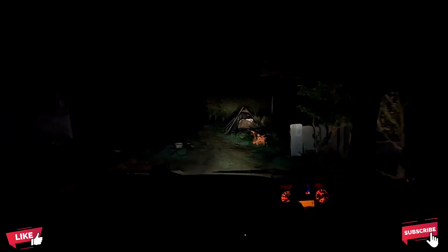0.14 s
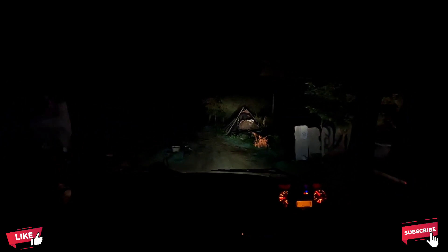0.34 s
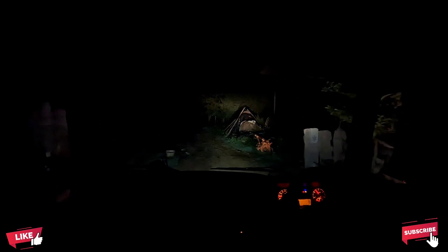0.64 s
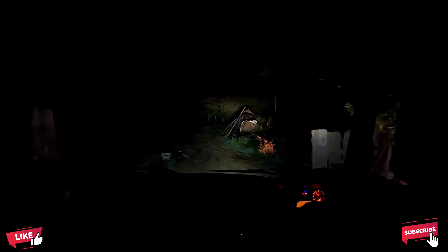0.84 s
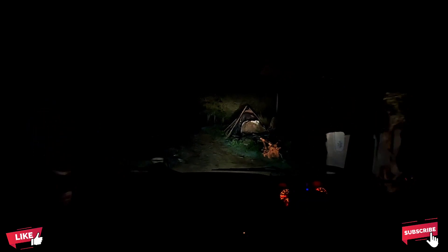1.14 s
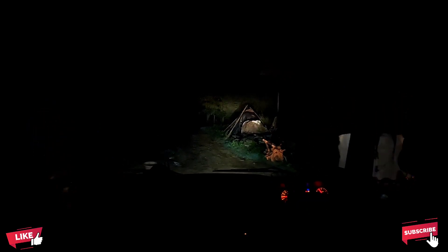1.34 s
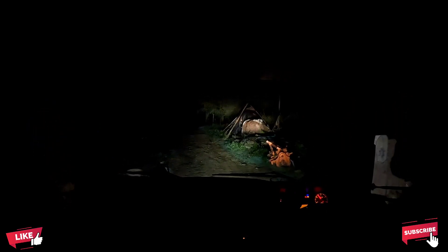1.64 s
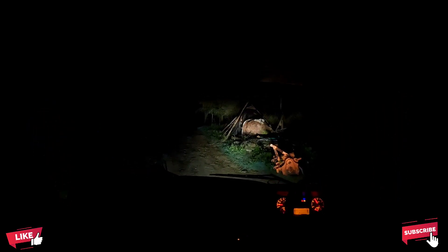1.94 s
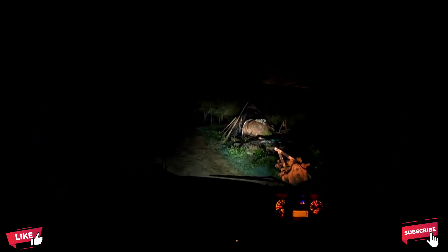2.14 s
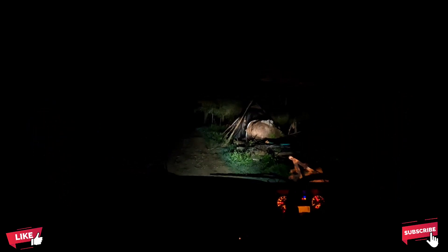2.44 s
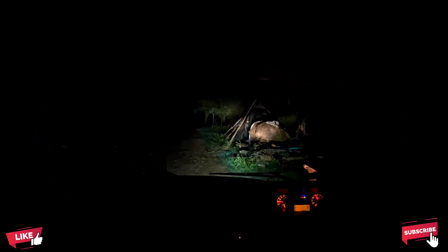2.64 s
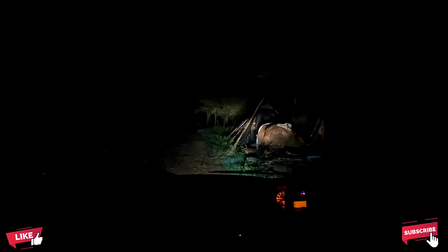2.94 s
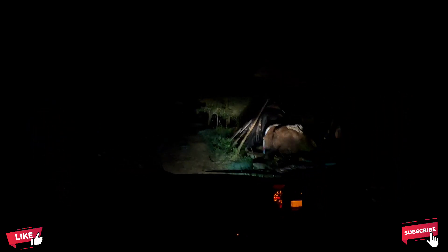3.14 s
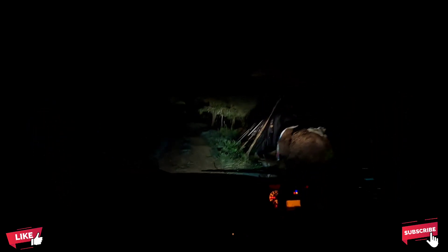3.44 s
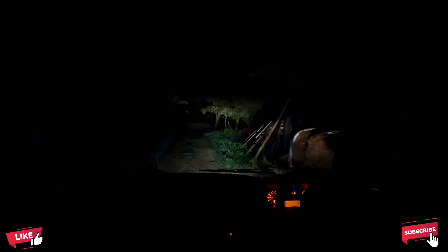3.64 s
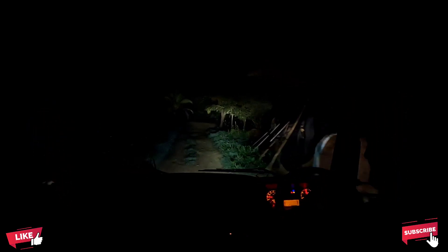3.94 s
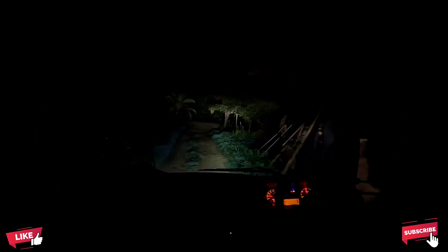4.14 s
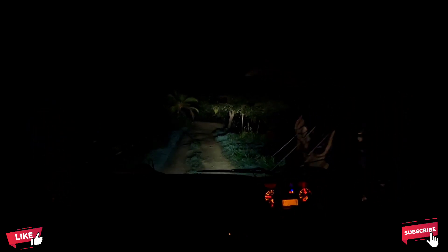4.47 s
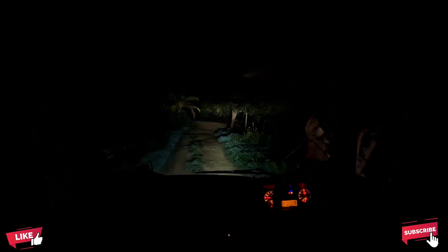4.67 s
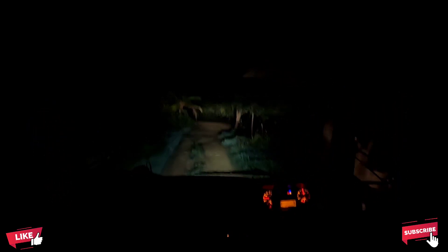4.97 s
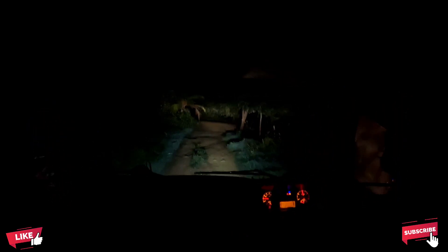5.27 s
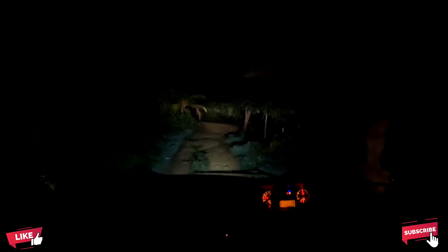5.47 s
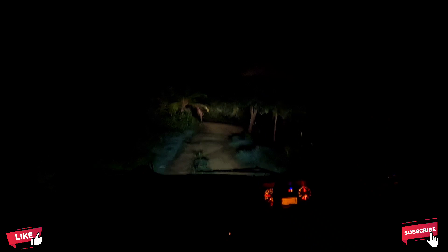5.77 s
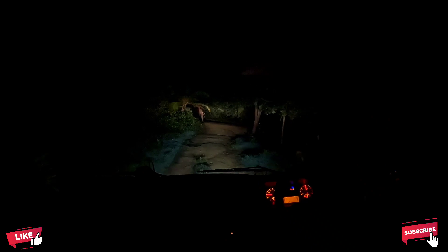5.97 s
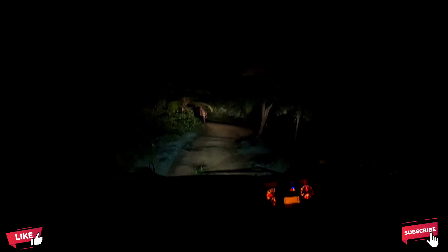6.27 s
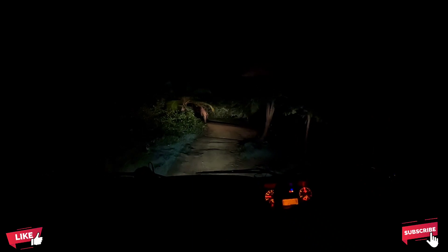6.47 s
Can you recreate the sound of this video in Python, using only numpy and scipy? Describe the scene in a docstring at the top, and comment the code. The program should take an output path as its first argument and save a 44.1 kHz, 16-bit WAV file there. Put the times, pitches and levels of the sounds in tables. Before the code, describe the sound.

A diesel truck rumbles slowly along a rough track, heard inside the cab, with loose panels knocking and rattling over the bumps.

```python
"""Diesel truck on a rutted track

From inside the cab, you hear a loaded truck crawl along and slowly gather speed. The firing cylinders
rumble and make the cab drone, gear teeth whine, and air hisses into the engine's intake.
Ruts rock the cab, loose panels knock and rattle over the bumps, and small metal parts clink."""
import sys
import numpy as np
from scipy import signal
from scipy.io import wavfile

SR = 44100
rng = np.random.default_rng(int(sys.argv[2]) if len(sys.argv) > 2 else 0)


def output_pcm(signal):
    """Save a mono or channel-first signal as 16-bit PCM at the path in sys.argv[1].

    Samples are clipped to [-1, 1] before scaling.
    """
    pcm = np.clip(np.atleast_2d(signal).T, -1, 1) * 32767
    wavfile.write(sys.argv[1], SR, np.round(pcm).astype(np.int16))


N = 291501
TIME = np.arange(N) / SR

# Engine speed, given as how often the gear teeth meet: (time [s], mesh rate [Hz])
MESH_RATE = [(0, 260), (0.2, 265), (0.47, 296.7), (0.8, 276.9), (1.12, 285.8), (1.3, 309.3), (1.6, 281.3),
             (1.88, 307.2), (2.36, 307.1), (2.62, 329.4), (2.85, 327), (3.08, 334.3), (3.35, 339),
             (3.65, 348.7), (4.75, 365.4), (5.6, 401.5), (5.95, 380.4), (6.2, 393.3), (6.5, 364)]
CRUISE_MESH_HZ, TEETH_PER_FIRING = 340, 6.17
# The four cylinders fire unequally: (strength [dB])
CYLINDER_DB = [-1.1, -5.5, -3, -1]
# Tone of the engine's deep rumble: (frequency [Hz], relative level [dB])
RUMBLE_SPECTRUM = [(55, 7), (75, 8), (105, 4.5), (160, 2), (220, 1.5), (300, -25)]
# Tone of the engine block's roar: (frequency [Hz], relative level [dB])
ROAR_SPECTRUM = [(170, -12.5), (250, -7), (330, -1), (430, -5), (600, -7), (800, -18), (1100, -19.5),
                 (2000, -54)]
# Tone of the hard clatter of burning fuel: (frequency [Hz], relative level [dB])
CLATTER_SPECTRUM = [(600, 4), (900, 1.5), (1400, -1.5), (2000, -8.5), (2700, -14), (3500, -25), (4500, -57),
                    (7000, -44), (11000, -23.5), (15500, -49)]
# The cab air drones in step with the firings: (time [s], level [dB])
DRONE_LEVEL = [(0, -22), (0.07, -27), (0.13, -41), (0.25, -44), (0.3, -26), (0.48, -20.5), (0.62, -22.5),
               (0.72, -34), (0.88, -20.5), (0.97, -34), (1.1, -24), (1.25, -31), (1.38, -19.5),
               (1.53, -25.5), (1.62, -29), (1.8, -27), (2.05, -20), (2.21, -24.5), (2.35, -21),
               (2.48, -23.5), (2.62, -17.5), (2.76, -31), (2.87, -21), (3.05, -23.5), (3.2, -27.5),
               (3.55, -38), (3.7, -23.5), (3.92, -30.5), (4.1, -24.5), (4.3, -24.5), (4.8, -23.5),
               (5.05, -31.5), (5.28, -26), (5.5, -33.5), (6.61, -27)]
# The gear teeth sing as they take load: (time [s], level [dB])
WHINE_LEVEL = [(0, -43), (0.3, -41), (0.45, -28.5), (0.75, -46), (0.95, -37), (1.06, -39), (1.28, -34),
               (1.68, -44), (1.86, -28.5), (2.25, -31.5), (2.42, -30), (2.62, -28), (2.85, -26.5),
               (3.03, -33), (3.12, -35.5), (3.45, -30), (3.62, -29.5), (3.95, -37.5), (4.9, -30),
               (5.4, -41.5), (5.6, -30.5), (5.9, -36), (6.2, -38.5), (6.61, -29)]
# At speed the teeth rattle in their gaps: (mesh rate [Hz], phase jitter [rad], level waver [dB])
BACKLASH = [(331, .13, 1.2), (339, 1.15, 2.8)]
# Air drawn by the engine, shut off near the end: (time [s], level [dB])
AIRFLOW = [(0, -65), (0.55, -63), (1.05, -67.5), (1.22, -59.5), (1.55, -59), (1.72, -61), (2.15, -55),
           (2.4, -59), (2.7, -54.5), (3.15, -53.5), (3.9, -54.5), (4.4, -57), (4.95, -55.5), (5.22, -54),
           (5.65, -51), (5.85, -79), (6.61, -70)]
# Resonances of the intake pipe: (pitch [Hz], width [Hz], gain [dB])
DUCT_MODES = [(477, 17, 44.5), (1066, 530, 27.5), (1670, 436, 24.5), (3280, 100, 10), (4370, 2500, -3),
              (5740, 1200, 4.5), (7530, 1700, 2.5), (7740, 470, 1)]
# Tone of the intake's hiss: (frequency [Hz], relative level [dB])
HISS_SPECTRUM = [(3000, -18), (4500, -1.5), (6000, 2.5), (7700, -1), (10000, -3), (11200, -4), (12500, -14),
                 (15500, -15)]
# Air whistles at the lip of the intake: (time [s], level [dB], pitch [Hz])
WHISTLE = [(0, -83, 5700), (0.55, -65, 5700), (1.11, -73, 5680), (1.17, -63.5, 5740), (1.45, -58, 5720),
           (1.52, -54, 5950), (1.59, -58, 5700), (1.64, -68, 5750), (1.9, -64, 5700), (2.15, -59, 5740),
           (2.42, -59, 5700), (2.6, -67, 5680), (2.66, -57, 5650), (2.77, -62, 5650), (2.95, -55, 5694),
           (3.04, -62, 5700), (3.15, -60, 5620), (3.4, -63, 5710), (3.7, -61, 5714), (4.15, -61, 5674),
           (4.4, -61, 5638), (4.9, -63, 5550), (5.22, -58, 5530), (5.62, -60, 5550), (5.85, -82, 5570)]
# The wheels roll through ruts: (time at the deepest [s], length [s], rocking [dB], rumble lift [dB])
RUTS = [(0.46, 0.12, -18.5, 5.5), (0.797, 0.28, -19, 2.5), (1.108, 0.087, -22, 2.5),
        (1.562, 0.28, -15, 3.5), (1.9, 0.24, -19.5, 4.5), (2.1, 0.17, -11.5, 3.5), (2.31, 0.19, -14.5, 1.5),
        (2.627, 0.31, -16, 0.5), (3.2, 0.74, -18, 1.5), (3.515, 0.53, -13.5, -0.5), (3.859, 0.39, -13.5, 1),
        (4.104, 0.17, -11.5, 1), (4.373, 0.4, -13.5, 3.5), (4.565, 0.13, -26, 4.5),
        (4.93, 0.17, -12.5, 1.5), (5.255, 0.27, -10.5, 1), (5.418, 0.2, -11.5, -1), (5.602, 0.23, -11.5, 6),
        (5.753, 0.18, -13.5, 0), (5.993, 0.17, -15.5, 4.5), (6.2, 0.27, -20.5, 3.5),
        (6.463, 0.31, -13.5, 1.5)]
# Loose panels knock: (time [s], level [dB], low body offset [dB], sharp edge offset [dB], ring [Hz])
KNOCKS = [(0.303, -28.5, -18, -8, 2580), (0.316, -24.5, 4.5, -15, 1570), (0.791, -28.5, 6, -22, 1540),
          (0.957, -26, 4.5, -22, 1085), (1.2595, -31.5, -1, -30, 1300), (1.4454, -26, 2, -16, 1800),
          (1.5, -26, -11, -12, 1557), (1.514, -30, -2, -18, 1560), (1.526, -28, -11, -18, 1786),
          (1.5452, -30, -6, -20, 2100), (1.563, -27, -3, -22, 1550), (1.577, -30, -4, -20, 1800),
          (1.604, -27, -19, -40, 975), (1.8141, -24, -1, -7.5, 1400), (1.9453, -35, -4, -2, 1550),
          (2.0281, -22, 6, -15, 1350), (2.0641, -21, -2, -25, 1390), (3.417, -28, -10, -4.5, 1341),
          (3.7938, -24.5, 3, -30, 985.4), (4.072, -27.5, 1, -9, 1351), (4.331, -35, -2, 4, 2455),
          (4.397, -29, 1, -25, 1300), (4.6525, -22, 7.5, -24, 1350), (4.7265, -28, -19, -11, 1350),
          (5.186, -22.5, -8, -24, 1343), (5.217, -22.5, 1, -11, 1333), (5.5212, -19.5, 4.5, -21, 1335),
          (5.549, -27.5, -9, -2, 1000), (5.574, -21.5, -6, -11, 1400), (5.614, -24, 1, -15, 1900),
          (5.630, -25.5, 2, -10, 1000), (5.654, -31, -2, -15, 1085), (5.694, -26.5, 5, -9, 2098),
          (5.7078, -31, 8, -8, 2630), (5.751, -35, -3, -5, 2650), (5.768, -33, 3, -2, 2630),
          (5.778, -36, 5, -4, 2630), (6.086, -34, -5, -1, 2630)]
# Notes a loose panel rings at: (pitch [Hz], gain [dB], time to fade by 60 dB [s])
PANEL_MODES = [(962, 1, 0.033), (1076, -3.5, 0.055), (1272, 1.5, 0.036), (1375, -7, 0.11),
               (1532, -4, 0.047), (1810, -4.5, 0.043), (2076, -8.5, .05), (2360, -9.5, 0.043),
               (2590, -13, 0.11), (3320, -20, 0.055), (4650, -28, 0.049)]
# Notes of the hollow behind a panel: (pitch [Hz], gain [dB], time to fade by 60 dB [s])
HOLLOW_MODES = [(300, -11, 0.13), (461.5, -2, 0.076), (640, -16.5, 0.068)]
# The chassis takes a blow: (time [s], level [dB])
THUDS = [(0.3165, -18.5), (1.451, -18), (1.608, -27), (4.658, -16), (4.673, -19), (5.533, -15),
         (5.658, -11.5), (5.72, -12.5), (6.19, -18)]
# A jolt sets the cab booming: (time at the loudest [s], length [s], level [dB], pitch [Hz])
BOOMS = [(1.576, 0.44, -34, 163), (1.856, 0.15, -27, 110.9)]
# Fittings chatter after a jolt: (start [s], length [s], body level [dB], bright edge level [dB])
CHATTER = [(0.156, 0.048, -39, -67), (1.481, 0.13, -34, -63), (5.527, 0.277, -43, -53.5)]
# Tone of the chatter's body: (frequency [Hz], relative level [dB])
CHATTER_BODY_SPECTRUM = [(700, 15), (1100, 5), (1700, 7), (2400, 3), (3500, -37), (6000, -12), (12000, -22)]
# Tone of the chatter's bright edge: (frequency [Hz], relative level [dB])
CHATTER_EDGE_SPECTRUM = [(3500, -16), (6000, 5), (8000, -5), (11000, 9), (15500, -12)]
# Small metal parts clink: (time [s], level [dB], pitch [Hz])
CLINKS = [(0.288, -40.5, 6560), (0.326, -43, 6160), (0.4559, -45.5, 5700), (0.7553, -45.5, 6340),
          (1.2236, -47, 5725), (1.85, -52, 8600), (2.48, -55, 9300), (3.77, -50, 5650), (3.971, -46, 7930),
          (4.7848, -51, 7500), (5.3046, -45, 5600), (5.606, -49, 10300), (6.169, -46, 7740),
          (6.4726, -36.5, 5900), (6.479, -40, 7800)]
# Hard plastic trim snaps: (time [s], level [dB], pitch [Hz])
SNAPS = [(3.7705, -48, 10500), (3.9705, -46, 10500), (4.4427, -49, 11000), (4.7864, -51, 12500),
         (5.2425, -51, 12500), (5.304, -48, 10500), (5.5505, -47, 7000), (5.569, -39.5, 4200),
         (5.629, -42, 9500), (5.6935, -42, 4560), (5.7074, -39.5, 3700), (5.7505, -49, 4500),
         (5.7677, -47, 4400), (5.7765, -52, 10500)]
# Resonances of the buzzing dashboard trim: (pitch [Hz], width [Hz], gain [dB])
TRIM_MODES = [(642, 33, -26), (2390, 160, -42), (2800, 270, -57), (3260, 59, -59), (3770, 30, -49)]
# Resonances of the cab's air and panels: (pitch [Hz], width [Hz], boost or cut [dB])
CAB_MODES = [(104.4, 10.6, 3.5), (158, 8.3, 3.5), (221, 10, 6.5), (283.5, 24.6, 5), (383, 26, -4),
             (444.6, 35, 3.5), (554, 44, -3.5), (642, 47, 5.5), (790, 14, 0.5), (970, 17, 5.5),
             (1375, 29, 5), (2980, 270, -2.5)]


def engine(firings, mesh_hz, lift_db, air_db):
    """Firings pulse a rumble, a roar and a clatter. Speed and ruts make all three louder."""
    load_db = air_db + 58  # airflow compared with a full breath at -58 dB
    rumble_db = speed_level(mesh_hz, cruise_db=-33.5, db_per_octave=3.3) + lift_db
    roar_db = speed_level(mesh_hz, cruise_db=-30.5, db_per_octave=16.1) + .48 * lift_db
    clatter_db = speed_level(mesh_hz, cruise_db=-38.5, db_per_octave=16.2) + .28 * lift_db
    clatter_db += .096 * load_db
    throb = firing_pulses(firings, depth=.4, decay=.15, scatter_db=2)
    knock = firing_pulses(firings, depth=.35, decay=.08, scatter_db=2.5)
    rumble = from_db(rumble_db) * rms_one(cab(throb * shaped_noise(RUMBLE_SPECTRUM, flicker_db=0)))
    roar = from_db(roar_db) * rms_one(cab(throb * shaped_noise(ROAR_SPECTRUM, flicker_db=.6)))
    clatter = from_db(clatter_db) * rms_one(cab(knock * shaped_noise(CLATTER_SPECTRUM, flicker_db=1.5)))
    return rumble + roar + clatter


def firing_pulses(firings, depth, decay, scatter_db):
    """Each firing makes a quick swell that fades. The decay is a share of the gap between firings."""
    index, stroke = firings.astype(int), firings % 1
    strength = cylinder_strength(index, scatter_db * rng.standard_normal(1000)[index])
    swell = stroke / decay * np.exp(1 - stroke / decay)
    return rms_one(1 + depth * strength * swell)


def cylinder_strength(index, extra_db):
    """The cylinders take turns, each with its own strength."""
    return from_db(np.array(CYLINDER_DB)[index % len(CYLINDER_DB)] + extra_db)


def chug(firings, mesh_hz):
    """Each firing thumps, and the cab air drones along, limping with the unequal cylinders."""
    cycles = firings + .07 * drift(3)
    index = np.floor(cycles).astype(int)
    kicks = np.diff(index, prepend=index[0]) * cylinder_strength(index, 2 * rng.standard_normal(N))
    thumps = rms_one(band(kicks, 72, 140))
    thump_db = speed_level(mesh_hz, cruise_db=-43.5, db_per_octave=15)
    count = len(CYLINDER_DB)
    limp_db = .6 * np.interp(cycles, np.arange(count), CYLINDER_DB - np.mean(CYLINDER_DB), period=count)
    drone_db, = curves(DRONE_LEVEL)
    waver_db = 2 * drift(8.4)
    tone = np.sin(2 * np.pi * cycles) + from_db(-24) * np.sin(4 * np.pi * cycles)
    drone = from_db(drone_db + limp_db + waver_db) * np.sqrt(2) * tone
    return drone + from_db(thump_db) * thumps


def gear_whine(mesh_hz):
    """Meeting teeth sing a note and a weak octave. At speed, their slack makes it rough."""
    speeds, jitters, wavers = np.transpose(BACKLASH)
    whine_db, = curves(WHINE_LEVEL)
    phase = phase_of(mesh_hz) + np.interp(mesh_hz, speeds, jitters) * drift(16)
    waver_db = np.interp(mesh_hz, speeds, wavers) * drift(12)
    return from_db(whine_db + waver_db) * (np.sin(phase) + from_db(-16.5) * np.sin(2 * phase))


def intake(firings, mesh_hz, lift_db, air_db):
    """The engine gulps air, which hisses, whistles and sounds the pipe's resonances."""
    hiss_db = speed_level(mesh_hz, cruise_db=-60, db_per_octave=1.1) + .32 * lift_db
    gulps = firing_pulses(firings, depth=.12, decay=.15, scatter_db=2)
    flutter_db, duct = 2.3 * drift(14), 0
    for hz, width, db in DUCT_MODES:
        flutter_share = min(hz / 5000, 1)  # high notes flutter most
        rush = band(rng.standard_normal(N), hz - width / 2, hz + width / 2)
        duct += from_db(db + flutter_share * flutter_db) * rush
    hiss = from_db(hiss_db) * shaped_noise(HISS_SPECTRUM, flicker_db=2.5)
    return gulps * (from_db(air_db) * duct + hiss + whistle())


def whistle():
    """Air at the intake's lip makes a narrow band of noise that wanders and flutters."""
    width_hz, wander_hz, flutter_db = 300, 85, 3
    level_db, centre_hz = curves(WHISTLE)
    phase = phase_of(centre_hz + wander_hz * drift(24))
    low_pass = signal.butter(2, width_hz / 2, fs=SR, output="sos")
    slow_a, slow_b = signal.sosfilt(low_pass, rng.standard_normal((2, N)))
    breath = rms_one(slow_a * np.cos(phase) + slow_b * np.sin(phase))  # moves the noise up to the pitch
    return from_db(level_db + flutter_db * drift(28)) * breath


def ruts():
    """Each rut gives a smooth swell of rocking and changes the rumble's level, mostly upward."""
    power, lift_db = 0, 0
    for time, length, rocking_db, rumble_db in RUTS:
        swell = hump(time, length)
        power += (from_db(rocking_db) * swell) ** 2
        lift_db += rumble_db * swell
    return np.sqrt(power), lift_db


def cab_shake(mesh_hz, rut_rocking):
    """The cab rocks at its own low resonance and shudders over the ground."""
    rocking_db = speed_level(mesh_hz, cruise_db=-26.5, db_per_octave=11)
    shudder_db = speed_level(mesh_hz, cruise_db=-28, db_per_octave=15)
    sway = np.hypot(from_db(rocking_db), rut_rocking)
    rocking = np.sqrt(2) * np.sin(phase_of(hz=25.3 + 1.3 * drift(4)))
    jolts = rms_one(band(band(rng.standard_normal(N), 18.9, 28), 8.8, 41))
    shudder = rms_one(band(band(rng.standard_normal(N), 34.3, 44.9), 30.6, 58))
    return sway * (.89 * rocking + .29 * jolts) + from_db(shudder_db) * shudder


def knocks():
    """A loose panel slaps its stop: it cracks and rings, and the hollow behind it booms."""
    times, level_db, body_db, edge_db, ring_hz = np.transpose(KNOCKS)
    ringing = panel_ring(times, level_db + .5, ring_hz)
    hollow = sum(ring(slaps(times, level_db + body_db + db), hz, t60) for hz, db, t60 in HOLLOW_MODES)
    crack = band_at_level(bursts(times, level_db - 17, t60=.073), 1700, 2480)
    body = cab(band_at_level(bursts(times, level_db + body_db - 6.5, t60=.12, rise_s=.0033), 270, 502))
    edge = band_at_level(bursts(times, level_db + edge_db - 6.5, t60=.09), 1200, 3560)
    return ringing + hollow + crack + body + edge


def panel_ring(times, levels_db, ring_hz):
    """The spot where a panel is struck favours its notes near one pitch."""
    off_pitch_db, reach_octaves = -10, .13
    out = 0
    for hz, db, t60 in PANEL_MODES:
        away = 1 - np.exp(-(np.log2(hz / ring_hz) / reach_octaves) ** 2)
        out += ring(slaps(times, levels_db + db + off_pitch_db * away), hz, t60)
    return out


def thuds():
    """Blows from the track arrive dulled through the chassis."""
    times, level_db = np.transpose(THUDS)
    blows = bursts(times, level_db - 9, t60=.075, rise_s=.0015)
    return cab(band_at_level(blows, 240, 840))


def booms():
    """After a jolt, one resonance of the cab swells and fades, a little unsteady in pitch."""
    wobble = .4 * drift(6)
    return sum(from_db(db) * hump(time, length) * np.sin(2 * np.pi * hz * TIME + wobble)
               for time, length, db, hz in BOOMS)


def chatter():
    """Jolted fittings rattle in quick, uneven taps over a steady buzz, then settle."""
    taps_per_s, tap_t60, ramp_s, settle_db = 130, .03, .015, -5.5
    taps = (rng.random(N) < taps_per_s / SR) * rng.uniform(.5, 1, N)
    flares = rms_one(signal.lfilter([1], [1, -fade(1 / SR, tap_t60)], taps + 1e-18))
    contacts = rms_one(np.sqrt(.2 + flares))
    body = shaped_noise(CHATTER_BODY_SPECTRUM, flicker_db=2)
    edge = shaped_noise(CHATTER_EDGE_SPECTRUM, flicker_db=1)
    out = 0
    for start, length, body_db, edge_db in CHATTER:
        age = TIME - start
        gate = np.clip(np.minimum(age, length - age) / ramp_s, 0, 1)
        settling = from_db(settle_db * np.clip(age / length, 0, 1))
        out += gate * contacts * settling * (from_db(body_db) * body + from_db(edge_db) * edge)
    return out


def clinks():
    """Each small metal part jingles briefly at its own pitch, with a bright tick."""
    out, age = np.zeros(N + SR), TIME[:SR // 8]
    envelope = flare(age, t60=.068, rise_s=.00048)
    for time, db, hz in CLINKS:
        contact = from_db(db - 2.5) * envelope * rng.standard_normal(len(age))
        jingle = band_at_level(contact, hz - 300, hz + 600)
        tick = band_at_level(band(contact, 6100, .45 * SR), 4900, 9700)
        start = int(time * SR)
        out[start:start + len(age)] += jingle + tick
    return out[:N]


def snaps():
    """Loose plastic trim snaps against its seat and bounces once."""
    bounce_s, bounce_db, band_ratio = .011, -6, 1.3
    out = 0
    for time, db, hz in SNAPS:
        hits = bursts([time, time + bounce_s], [db, db + bounce_db], t60=.041, rise_s=.0012)
        out += band_at_level(hits, hz / band_ratio, hz * band_ratio)
    return out


def ticks(per_second=3.8):
    """Loose odds and ends tick faintly at random."""
    when, chance = rng.random((int(per_second * N / SR), 2)).T
    levels_db = -60 - np.log(.02 + chance)
    return band_at_level(bursts(when * TIME[-1], levels_db, t60=.031), 5500, 14000)


def trim_buzz():
    """The dashboard trim buzzes faintly and unevenly all the time."""
    buzz = rng.standard_normal(N) * from_db(2.5 * drift(25))
    return sum(from_db(db) * resonance(buzz, hz, width) for hz, width, db in TRIM_MODES)


def cab(x):
    """The cab boosts some narrow ranges of pitch and swallows others."""
    for hz, width, boost_db in CAB_MODES:
        x = x + (from_db(boost_db) - 1) * resonance(x, hz, width)
    return x


def speed_level(mesh_hz, cruise_db, db_per_octave):
    """Level in dB of a sound that grows with engine speed. An octave is a doubling."""
    return cruise_db + db_per_octave * np.log2(mesh_hz / CRUISE_MESH_HZ)


def from_db(db):
    """Turn decibels into a gain to multiply by."""
    return 10 ** (np.asarray(db) / 20)


def rms_one(x):
    """Scale a signal so that its average power is 1."""
    return x / np.sqrt(np.mean(x ** 2) + 1e-20)


def curves(rows):
    """Join a table's points in time with straight lines, one curve per value column."""
    times, *columns = np.transpose(rows)
    return [np.interp(TIME, times, column) for column in columns]


def phase_of(hz):
    """The running angle of a wave whose pitch changes."""
    return 2 * np.pi * np.cumsum(hz) / SR


def drift(rate_hz):
    """A smooth random wander, about 1 in size."""
    step, warm_up = 40, 2000
    pole = np.exp(-2 * np.pi * step * rate_hz / SR)
    noise = rng.standard_normal(N // step + warm_up + 2)
    slow = signal.lfilter([1], [1, -2 * pole, pole * pole], noise)[warm_up:]
    return np.interp(np.arange(N) / step, np.arange(len(slow)), rms_one(slow))


def hump(middle_s, length_s):
    """One rounded rise from 0 to 1 and back."""
    return np.cos(np.pi * np.clip((TIME - middle_s) / length_s, -.5, .5))


def fade(age, t60):
    """A gain that falls by 60 dB every t60 seconds."""
    return np.exp(-np.log(1000) * age / t60)


def flare(age, t60, rise_s):
    """The outline of a hit: a fast rise, then a fade."""
    return (1 - np.exp(-age / rise_s)) * fade(age, t60)


def bursts(times, levels_db, t60, rise_s=.0005):
    """Noise that flares at each contact and dies away."""
    envelope = np.zeros(N)
    for time, db in zip(times, levels_db):
        start = int(time * SR)
        age = TIME[:min(N - start, SR // 2)]
        envelope[start:start + len(age)] += from_db(db) * flare(age, t60, rise_s)
    return envelope * rng.standard_normal(N)


def slaps(times, levels_db):
    """Clicks, each up to 3 ms late and up to 2 dB louder or softer."""
    delay, chance = rng.random((len(times), 2)).T
    out = np.zeros(N)
    out[((times + .003 * delay) * SR).astype(int)] = from_db(levels_db + 4 * (chance - .5))
    return out


def shaped_noise(spectrum, flicker_db):
    """Noise with a given tone, built from roughly half-octave bands that can each flicker."""
    hz, db = np.transpose(spectrum)
    edges = np.geomspace(hz[0], hz[-1], 2 + int(2 * np.log2(hz[-1] / hz[0])))
    white, out = rng.standard_normal((2, N)), 0
    for k, (low, high) in enumerate(zip(edges, edges[1:])):
        level_db = np.interp(np.log(low * high) / 2, np.log(hz), db)
        out += band(white[k % 2], low, high) * from_db(level_db + flicker_db * drift(11.5))
    return rms_one(out)


def band(x, low_hz, high_hz):
    """Keep the sound between two frequencies."""
    return signal.sosfilt(signal.butter(2, [low_hz, high_hz], "band", fs=SR, output="sos"), x + 1e-18)


def band_at_level(x, low_hz, high_hz):
    """Keep one band, turned up so that white noise loses no power."""
    return band(x, low_hz, high_hz) * np.sqrt(SR / 2 / (high_hz - low_hz))


def resonance(x, hz, width_hz):
    """Let one pitch through at full strength and weaken the rest."""
    pole = np.exp(-np.pi * width_hz / SR)
    feedback = [1, -2 * pole * np.cos(2 * np.pi * hz / SR), pole * pole]
    return signal.lfilter(np.array([1, 0, -1]) * (1 - pole * pole) / 2, feedback, x + 1e-18)


def ring(clicks, hz, t60):
    """Each click starts a pure note that dies away."""
    pole, angle = fade(1 / SR, t60), 2 * np.pi * hz / SR
    return signal.lfilter([0, np.sin(angle)], [1, -2 * pole * np.cos(angle), pole * pole], clicks + 1e-18)


def scene():
    """One shaft speed drives the engine, gear and intake. The track adds ruts and blows."""
    mesh_hz, = curves(MESH_RATE)
    air_db, = curves(AIRFLOW)
    firings = np.cumsum(mesh_hz / TEETH_PER_FIRING) / SR  # how many firings so far
    rocking, lift_db = ruts()
    drive = engine(firings, mesh_hz, lift_db, air_db) + chug(firings, mesh_hz)
    drive += gear_whine(mesh_hz) + intake(firings, mesh_hz, lift_db, air_db)
    sway = cab_shake(mesh_hz, rocking)
    rattles = trim_buzz() + knocks() + thuds() + booms() + clinks() + chatter() + ticks() + snaps()
    dip = from_db(-17 * hump(middle_s=5.5875, length_s=.011) ** 2)  # the level dips briefly mid-rattle
    return (sway + dip * (drive + rattles))[None]


def record(dry):
    """Cut the highest treble steeply and ease the sound in and out."""
    cutoff_hz, ease_s = 15800, .004
    ends = np.minimum(np.minimum(TIME, TIME[-1] - TIME) / ease_s, 1)
    return ends * signal.sosfilt(signal.ellip(10, .1, 80, cutoff_hz, fs=SR, output="sos"), dry)


dry = scene()
out = record(dry)
output_pcm(out)
```